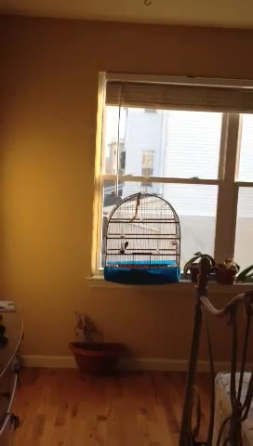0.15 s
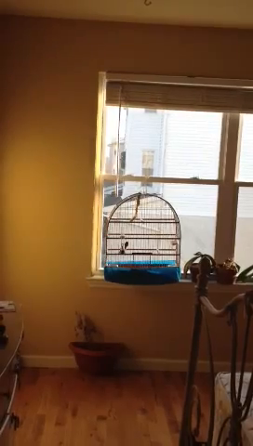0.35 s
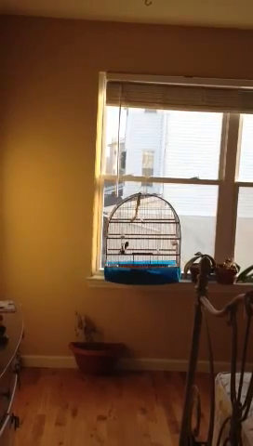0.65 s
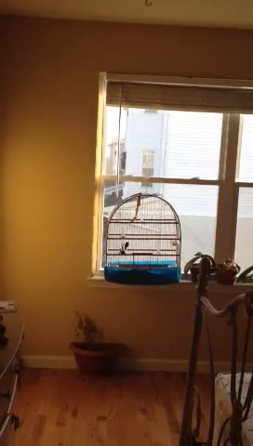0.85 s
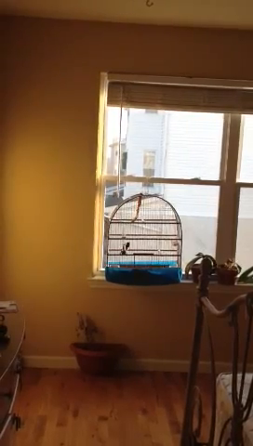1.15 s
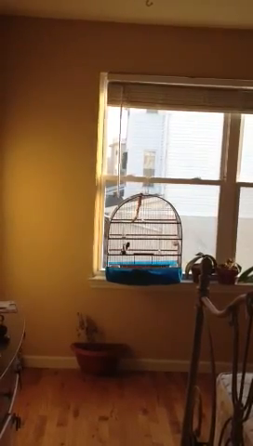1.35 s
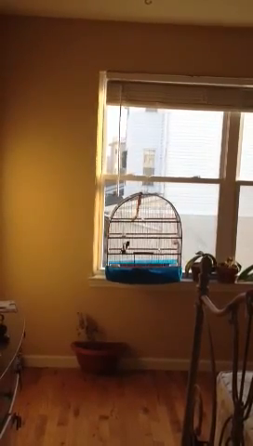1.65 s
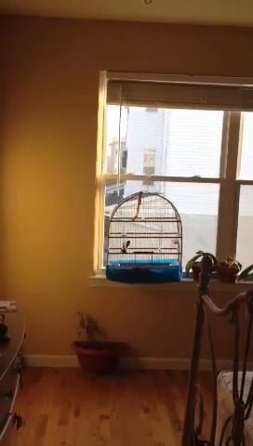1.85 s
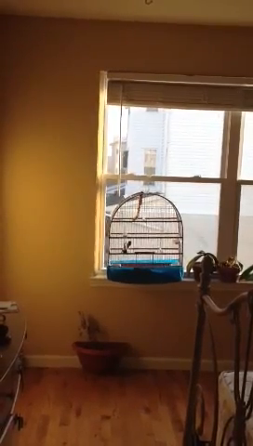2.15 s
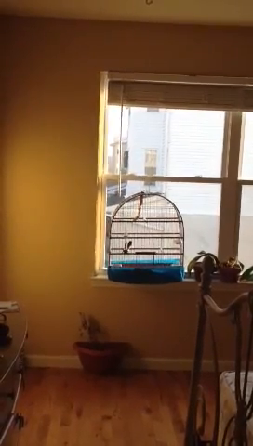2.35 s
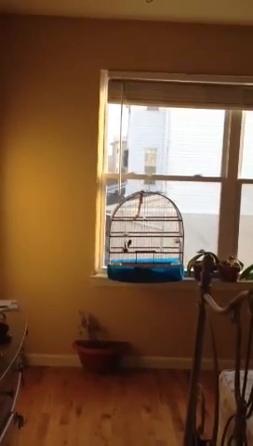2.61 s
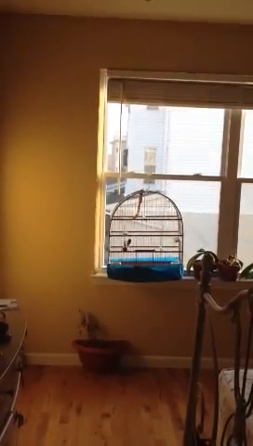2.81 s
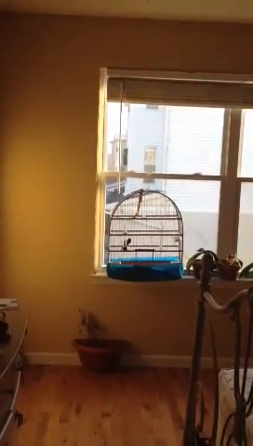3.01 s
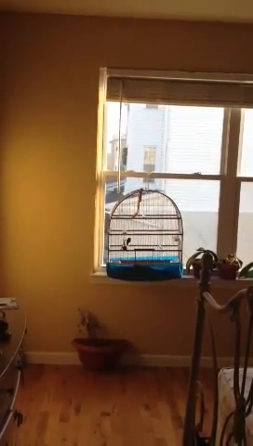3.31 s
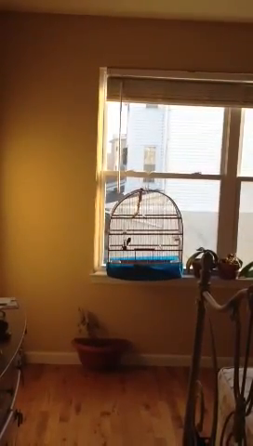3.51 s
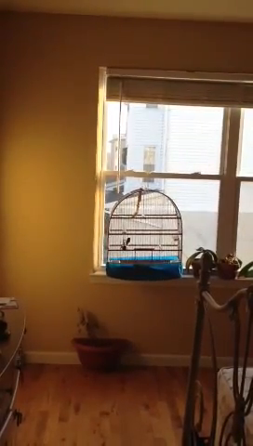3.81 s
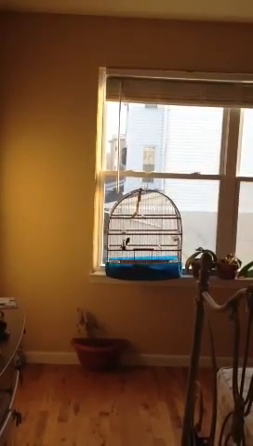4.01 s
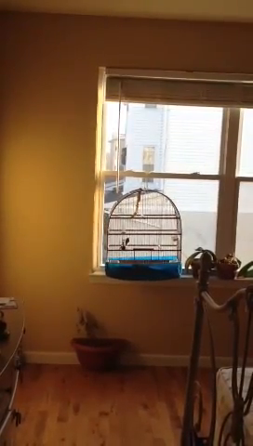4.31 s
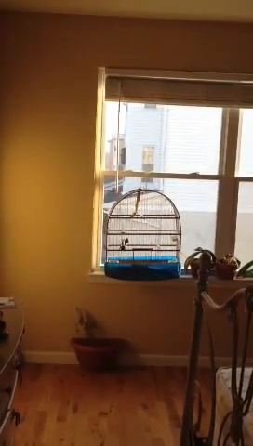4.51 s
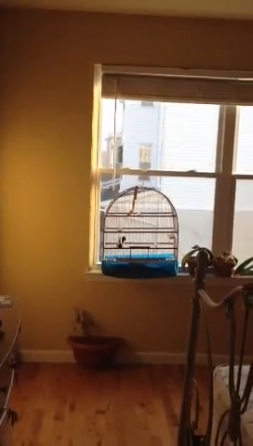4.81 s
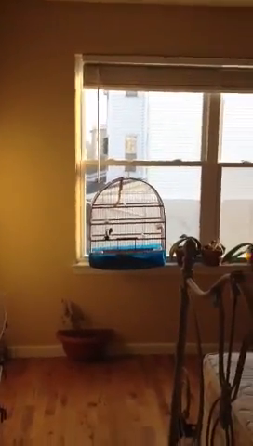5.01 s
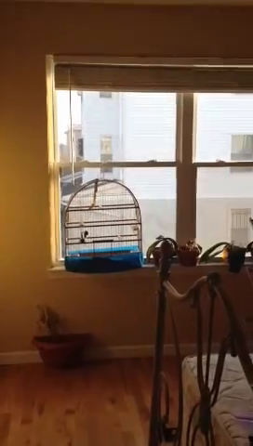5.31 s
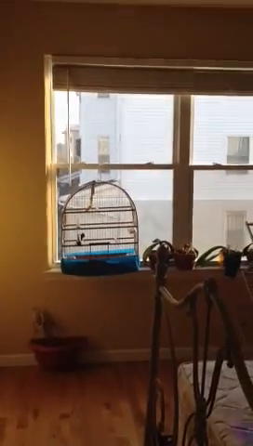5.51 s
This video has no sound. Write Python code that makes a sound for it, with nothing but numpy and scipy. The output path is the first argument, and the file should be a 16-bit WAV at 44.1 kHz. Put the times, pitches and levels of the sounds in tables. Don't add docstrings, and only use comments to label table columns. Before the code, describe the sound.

A small caged bird sings a quick string of loud chirps, scoops, trills and buzzes across a bare, echoing room.

```python
import sys
import numpy as np
from scipy import signal
from scipy.fft import rfft, irfft, next_fast_len
from scipy.io import wavfile
from scipy.ndimage import uniform_filter1d, map_coordinates

SR = 44100
rng = np.random.default_rng(int(sys.argv[2]) if len(sys.argv) > 2 else 0)


def master_out(mix):
    frames = np.transpose(np.atleast_2d(mix))
    ceiling = np.clip(frames, -1, 1)
    pcm = np.round(ceiling * 32767).astype(np.int16)
    wavfile.write(sys.argv[1], SR, pcm)


def nominal_scale(level):
    x = np.asarray(level, float) / 20
    return 10 ** x


N = 249253

# (frequency [Hz], density [dB per Hz])
HUSH_SPECTRUM = [(20, -70), (55, -35), (110, -17.5), (170, -2), (215, -2), (260, -0.5), (320, -4.5),
                 (1100, -7), (3200, -10), (4100, -16.5), (7500, -12), (10000, -20), (13000, -18),
                 (15800, -30)]
# (frequency [Hz], level [dB])
APPLIANCE_DRONES = [(263.8, -60), (500.6, -62), (656.8, -64), (737.5, -63.5), (1093, -59)]
# (frequency [Hz], time to fall 60 dB [s])
ROOM_DECAY = [(500, 0.42), (2500, .45), (5000, 0.41), (8000, 0.35), (14000, 0.37)]
# (frequency [Hz], gain [dB])
PATH_COLOUR = [(1000, 0.5), (2500, -1), (3250, 0), (4300, -1.5), (7000, 0.5), (9500, 0), (12000, 4.5),
               (14500, -2.5)]
# (frequency [Hz], level [dB])
BREATH_COLOUR = [(1000, -30), (3000, -16.5), (7000, -7.5), (10000, -17.5), (14000, -10)]
# (time [s], level [dB], pitch share [ratio])
CHIP_TIMES = [
    (.441, 0, 0.98),
    (.721, 0, 0.9444),
    (.979, 1, 1.015),
    (1.123, 1, 1.009),
    (1.263, 1, 1.0275),
]
# (time [s], length [s], frequency [Hz], level [dB])
HOUSE_HUMS = [
    (1.017, .12, 680, -51.5),
    (1.019, 0.086, 918, -54),
    (1.339, 0.075, 670, -52),
    (1.795, 0.31, 700, -58),
    (2.102, 0.17, 780, -51),
    (2.282, 0.3, 671, -59),
    (2.296, 0.208, 943, -53.5),
    (5.045, 0.17, 697, -52),
    (4.8, 0.13, 1073, -52.5),
]
# (frequency [Hz], level [dB])
BEAK_COLOUR = [(1000, -24), (2200, -13.5), (3000, -10.5), (5000, -13.5), (6500, -7.5), (7500, -1),
               (9000, -8), (11000, -19), (15000, -10)]
# (frequency [Hz], level [dB])
WIDE_BEAK_COLOUR = [(1000, -28.5), (1500, -8), (2100, -8.5), (3000, -1.5), (3600, -12), (4300, -3.5),
                    (5300, -7), (6400, 0), (7400, 7.5), (9000, 0), (11000, -3.5), (15000, -9)]

# (left pitch multiple [ratio], right pitch multiple [ratio], level [dB])
OPENING_MIX = [(1, 0, 0), (0, 1, -17), (2, 0, -22), (1, 1, -19), (0, 2, -25), (1, 2, -24), (2, -1, -28),
               (0, 3, -26)]
NASAL_MIX = [(2, 0, 0), (0, 1, -4), (1, 0, -17), (1, 1, -18), (-1, 2, -16), (0, 2, -24)]
WHISTLE_MIX = [(1, 0, 0), (2, 0, -22), (3, 0, -24)]
SCOOP_MIX = [(1, 0, 0), (0, 1, -3), (-1, 2, -13), (3, 0, -28), (5, 0, -33), (4, 1, -33)]
ARCH_MIX = [(1, 0, 0), (0, 1, -2), (1, 1, -23), (2, 0, -28), (3, 0, -18), (1, 2, -23), (0, 3, -19),
            (2, 1, -21), (0, 4, -22), (0, 2, -27)]
HOLD_MIX = [(1, 0, 0), (2, 0, -32), (3, 0, -23), (4, 0, -34)]
TICK_MIX = [(1, 0, 0), (0, 1, -7), (1, 1, -23), (0, 2, -19), (2, 0, -24), (0, 3, -24), (1, 2, -24),
            (3, -2, -17), (-1, 3, -18), (2, 1, -24)]
PAIR_MIX = [(1, 0, 0), (0, 1, -3), (2, 0, -22), (1, 1, -22), (-1, 2, -12), (2, -1, -15)]
WHINE_MIX = [(1, 0, -4), (0, 1, -11), (2, 0, -5), (1, 1, -3), (3, 0, 0), (2, 1, -11), (4, 0, -16),
             (3, 1, -15), (5, 0, -22), (4, 1, -22), (6, 0, -20), (5, 1, -18), (1, 2, -18)]
SHRIEK_MIX = [(1, 0.0055, -2.5), (2, 0.0013, -24)]
WHEEZE_MIX = [(1, 0, -14.5), (0, 1, -13), (2, 0.0099, -11.5), (0.6, 1, -29)]
SLUR_MIX = [(2, 0, 0), (1, 0, -13), (3, 0, -16), (4, 0, -22), (5, 0, -24), (6, 0, -24), (7, 0, -26)]
SIGH_MIX = [(2, 0, 0), (0, 2, -7), (1, 0, -9), (3, 0, -20), (4, 0, -25)]
BUZZ_MIX = [(1, 0, -25), (2, 0, -23)]

SINGLE_SYLLABLES = {"opening": (0, .08, -10, 7050, 5560), "nasal": (.163, .186, -33.5, 1480, 1370),
                    "arch": (1.497, .113, -21.5, 4850, 3790), "hold": (1.598, .092, -23.5, 3120, 3300),
                    "lift": (2.209, .067, -36, 4950, 5660), "whine": (2.263, .228, -38, 2720, 2285),
                    "shriek": (2.505, .044, -8, 5850, 8050), "wheeze": (2.7, .19, -40, 1150, 1115),
                    "drop": (2.956, .059, -36, 6530, 6240), "blip": (2.978, .02, -48, 3350, 3100),
                    "slur": (2.995, .169, -24, 2420, 1810), "sigh": (3.165, .176, -38, 1790, 1674),
                    "mutter": (3.405, .075, -46, 1100, 1100), "rasp": (4.078, .078, -22.5, 1515, 1480),
                    "aftermutter": (4.259, .1, -48, 1270, 1210)}
FIGURE_PARTS = {"chip": (0, .022, -10, 6480, 4500), "scoop": (.027, .088, -20.5, 2060, 2700),
                "long scoop": (.029, .11, -23, 2060, 2750), "tick": (.001, .024, -20, 5950, 5050),
                "pip": (.014, .012, -26, 3450, 2900), "rebound": (.042, .03, -39, 3150, 3380),
                "buzz": (0, .038, -26, 1148, 1114)}
PITCH_GLIDES = {"opening": (.035, .07), "nasal": (0, .012), "arch": (.08, .06), "hold": (0, .015),
                "lift": (.03, .08), "whine": (-.12, .165), "shriek": (.012, .017), "wheeze": (0, .03),
                "drop": (0, .04), "blip": (.01, .03), "slur": (-.1, .32), "sigh": (.08, .2),
                "mutter": (.04, .1), "rasp": (.03, .08), "aftermutter": (.08, .05), "chip": (.014, .016),
                "scoop": (.036, .011), "long scoop": (.022, .022), "tick": (0, .004), "pip": (.006, .01),
                "rebound": (.008, .012), "buzz": (0, .02)}

# (attack [s], rise [dB], sag while held [dB], release [s], fall [dB])
SOFT, SHARP, FADING = (.025, 5, 3, .045, 7), (.009, 24, 6, .007, 7), (.003, 2, 5, .02, 5)
ARCHED, SHORT, STAB = (.018, 12, 1, .027, 8), (.005, 8, 0, .005, 9), (.009, 17, -1, .016, 14)
EVEN, LEANING, HEAVY = (.01, -1, 2, .02, -4), (.042, 15.5, 4, .033, 6), (.025, 16, 7, .028, 16)
PUFF, SLIDING = (.004, 3, 5, .015, 4), (.025, 17, 1, .05, 24)
HELD, CUT = (.03, 11, 2, .05, 1), (.02, 2, 2.5, .024, 15)
ALONE, NARROW, WIDE, UNDER = (1, 1), (1.18, 1.075), (1.41, 1.41), (.86, .8)
WAVER = .012


def unit(x):
    return x / np.sqrt(np.mean(x ** 2) + 1e-20)


def along(points, hz):
    f, v = np.transpose(points)
    return np.interp(np.log(hz + 1), np.log(f + 1), v)


def wobble(size, rate):
    knots = rng.standard_normal(int(size * rate / SR) + 4)
    return map_coordinates(knots, [np.arange(size) * rate / SR])


def coloured(x, gain):
    size = next_fast_len(N + 8192)
    hz = np.fft.rfftfreq(size, 1 / SR)
    return irfft(rfft(x, size) * gain(hz), size)[..., :N]


def contour(name, breath, sides):
    s, length, db, from_hz, to_hz = {**SINGLE_SYLLABLES, **FIGURE_PARTS}[name]
    turn, span = PITCH_GLIDES[name]
    attack, rise_db, sag_db, release, fall_db = breath
    t = np.linspace(0, length, 40)
    bend = np.tanh((t - turn) / span)
    done = (bend - bend[0]) / (bend[-1] - bend[0])
    left = from_hz + (to_hz - from_hz) * done
    right = left * (sides[0] + (sides[1] - sides[0]) * done)
    corners = np.maximum.accumulate([0, min(attack, length / 2), length - release, length])
    level_db = db - np.interp(t, corners, [rise_db, 0, sag_db, sag_db + fall_db])
    return np.transpose([s + t, left, right, level_db])


def buzz_tones(shape, beak, fall_db, count=9):
    left_hz, right_hz = np.mean(shape, axis=0)[1:3]
    tones = []
    for i in range(-count, count + 1):
        for j in range(-2, count):
            hz = i * left_hz + j * right_hz
            if 700 < hz < 15600:
                tones.append((i, j, along(beak, hz) - fall_db * min(abs(i), abs(j))))
    total_db = 10 * np.log10(sum(nominal_scale(2 * db) for i, j, db in tones))
    return [(i, j, db - total_db) for i, j, db in tones]


def add(out, shape, tones, rough, at=0., db=0., share=0.99):
    s, left_hz, right_hz, level_db = np.transpose(shape)
    t = np.arange(s[0], s[-1], 1 / SR)
    glide = []
    for hz in (left_hz, right_hz):
        tremble = rough * (wobble(len(t), 302.4) + wobble(len(t), 1196))
        glide.append(share * np.interp(t, s, hz) * (1 + tremble))
    left, right = 2 * np.pi * np.cumsum(glide, axis=1) / SR
    effort_db = np.interp(t, s, level_db)
    slack = 1 + (level_db.max() - effort_db) / 35
    sound = np.zeros(len(t))
    for i, j, gain_db in tones:
        tone = np.sin(i * left + j * right + 2 * np.pi * rng.random())
        audible = i * glide[0] + j * glide[1] < SR / 2.2
        sound += nominal_scale(gain_db * slack) * tone * audible
    edges = np.clip(np.minimum(t - s[0], s[-1] - t) / 0.0023, 0, 1)
    start = round((s[0] + at) * SR)
    out[start:start + len(t)] += sound * edges * nominal_scale(effort_db + db + 2.5)


def hush():
    hz, t, z = signal.stft(rng.standard_normal(N + 1024), SR, nperseg=1024)
    field = uniform_filter1d(rng.standard_normal(z.shape), 8, 0)
    field = uniform_filter1d(field, 6, 1)
    patches = z * nominal_scale(along(HUSH_SPECTRUM, hz)[:, None] + 1.55 * unit(field))
    return nominal_scale(-45.5) * unit(signal.istft(patches, nperseg=1024)[1][:N])


def appliance_drones(out):
    for hz, db in APPLIANCE_DRONES:
        steady = [(0, hz, hz, db - 7), (N / SR - .01, hz, hz, db - 5)]
        add(out, steady, [(1, 0.00065, 0)], rough=0.0401)


def opening_call(out):
    add(out, contour("opening", CUT, (.7, .73)), OPENING_MIX, rough=0.0116)


def rushing_air(song):
    effort = np.sqrt(np.abs(uniform_filter1d(song ** 2, 90)))
    air = coloured(rng.standard_normal(N), lambda hz: nominal_scale(along(BREATH_COLOUR, hz)))
    return nominal_scale(-28.5) * effort * unit(air)


def room(x):
    hz, t, z = signal.stft(rng.standard_normal(SR), SR, nperseg=128)
    tail = signal.istft(z * nominal_scale(-60 * t / along(ROOM_DECAY, hz)[:, None]), SR, nperseg=128)[1]
    t = np.arange(len(tail)) / SR
    tail = tail * (1 - np.exp(-t / 0.002)) * nominal_scale(4.05 * np.exp(-t / 0.024))
    return signal.fftconvolve(x, tail / np.linalg.norm(tail))[:N]


def nasal_call(out):
    add(out, contour("nasal", SOFT, WIDE), NASAL_MIX, rough=0.0094)


def chips_and_scoops(out):
    for k, (s, db, share) in enumerate(CHIP_TIMES):
        add(out, contour("chip", SHARP, ALONE), WHISTLE_MIX, .012, s, db, share)
        if k < 2:
            scoop = contour("long scoop", HELD, NARROW)
        else:
            scoop = contour("scoop", LEANING, NARROW)
        add(out, scoop, SCOOP_MIX, .004, s, 0, 1)


def house_hums(out):
    for s, length, hz, db in HOUSE_HUMS:
        swell = [(s, hz, hz, db + 1.5), (s + length / 3, hz, hz, db), (s + length, hz * 1.1, hz, db - 9.5)]
        add(out, swell, [(0.97, 0.003, 0)], rough=0.03)


def arch_and_hold(out):
    add(out, contour("arch", ARCHED, (.88, .79)), ARCH_MIX, rough=.025)
    add(out, contour("hold", HEAVY, ALONE), HOLD_MIX, rough=0.01)


def trill(out):
    start_s, gap_s, first_db, grows_db = 1.693, .0992, -5, 1.7
    for k in range(5):
        s, pip_db = start_s + k * gap_s, first_db + k * grows_db
        share = 1 + WAVER * rng.standard_normal()
        add(out, contour("tick", (.006, 8, 3, .014, 9), (.9, .8)), TICK_MIX, .028, s, 0, share)
        add(out, contour("pip", SHORT, ALONE), HOLD_MIX, .005, s, pip_db, 1)
        add(out, contour("rebound", SHORT, ALONE), HOLD_MIX, .005, s, pip_db, 1)


def lift_whine_and_shriek(out):
    add(out, contour("lift", EVEN, (1.28, 1.13)), PAIR_MIX, rough=0.0407)
    add(out, contour("whine", SOFT, WIDE), WHINE_MIX, rough=0.009)
    add(out, contour("shriek", STAB, ALONE), SHRIEK_MIX, rough=0.0078)


def wheeze(out):
    shape = contour("wheeze", SOFT, (1.62, 1.69))
    add(out, shape, buzz_tones(shape, BEAK_COLOUR, fall_db=3), rough=0.0111)
    add(out, shape, WHEEZE_MIX, rough=0.0072)


def slurs_and_mutter(out):
    add(out, contour("drop", EVEN, UNDER), PAIR_MIX, rough=0.03)
    add(out, contour("blip", SHORT, ALONE), HOLD_MIX, rough=.005)
    add(out, contour("slur", SLIDING, ALONE), SLUR_MIX, rough=.006)
    add(out, contour("sigh", SOFT, (.93, .94)), SIGH_MIX, rough=0.012)
    add(out, contour("mutter", SOFT, WIDE), NASAL_MIX, rough=0.068)


def rattle(out):
    start_s, gap_s, slows_s = 3.48, .061, .0002
    shape = contour("buzz", PUFF, (1.345, 1.345))
    for k in range(8):
        s = start_s + k * gap_s + k * k * slows_s
        share = 1 + WAVER * (rng.standard_normal() - 1)
        db = -3 * (k == 0)
        add(out, shape, BUZZ_MIX, .01, s, db, share)
        add(out, shape, buzz_tones(shape, BEAK_COLOUR, fall_db=3.0), .03, s, db, share)


def rasp_and_aftermutter(out):
    shape = contour("rasp", (.02, 12, 1, .03, 8), (1.43, 1.43))
    add(out, shape, buzz_tones(shape, WIDE_BEAK_COLOUR, fall_db=9), rough=0.0075)
    add(out, contour("aftermutter", FADING, WIDE), NASAL_MIX, rough=0.088)


def scene():
    song, house = np.zeros(N), np.zeros(N)
    appliance_drones(house)
    house_hums(house)
    for sing in (opening_call, nasal_call, chips_and_scoops, arch_and_hold, trill, lift_whine_and_shriek,
                 wheeze, slurs_and_mutter, rattle, rasp_and_aftermutter):
        sing(song)
    sources = song + rushing_air(song) + house
    voice = coloured(sources, lambda hz: nominal_scale(along(PATH_COLOUR, hz)))
    return (nominal_scale(-5) * voice + nominal_scale(2.2) * room(voice) + hush())[None]


def masked(x, under_db, up_db, down_db):
    hz, t, z = signal.stft(x, SR, nperseg=1024)
    band = np.floor(12 * np.arcsinh(hz / 600)).astype(int)
    power = [np.mean(np.abs(z[:, band == b]) ** 2, axis=1) for b in range(band.max() + 1)]
    level = 10 * np.log10(np.array(power) + 1e-20)
    step = np.subtract.outer(np.arange(len(level)), np.arange(len(level)))
    skirt = -under_db - np.where(step > 0, up_db * step, -down_db * step)
    hidden = level < np.max(level[None] + skirt[:, :, None, None], axis=1)
    heard = z * ~hidden[band].transpose(1, 0, 2)
    return signal.istft(heard, SR, nperseg=1024)[1][:, :N]


def low_pass(x):
    return signal.sosfilt(signal.butter(12, 16030, fs=SR, output="sos"), x)


def record(dry):
    held = dry / (1 + np.abs(dry) ** 8) ** (1 / 8)
    banded = coloured(held, lambda hz: (hz < 15700) * hz / np.hypot(hz, 60))
    mix = .95 * masked(banded, under_db=17, up_db=5.5, down_db=16)
    return low_pass(mix)


dry = scene()
out = record(dry)
master_out(out)
```